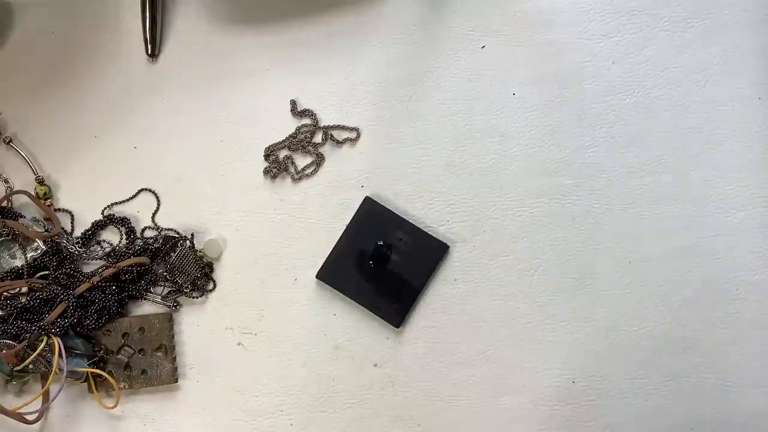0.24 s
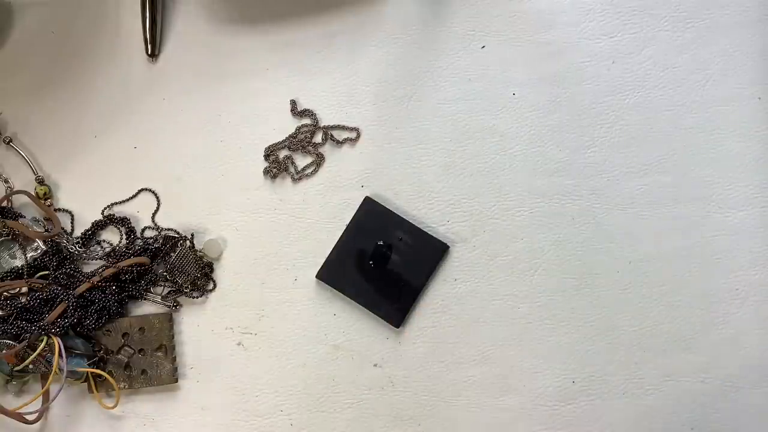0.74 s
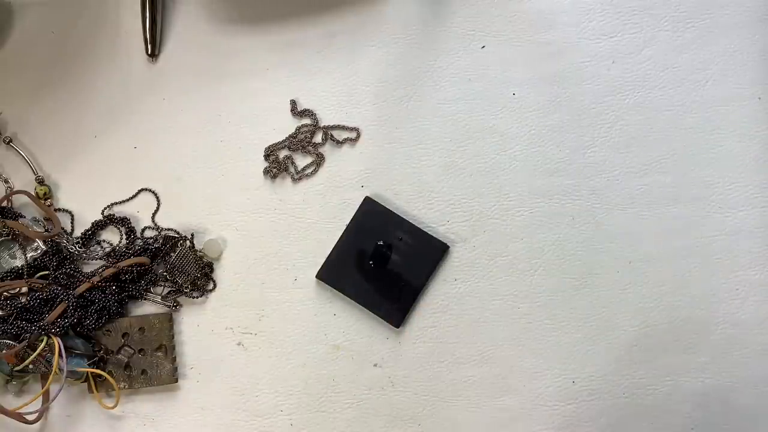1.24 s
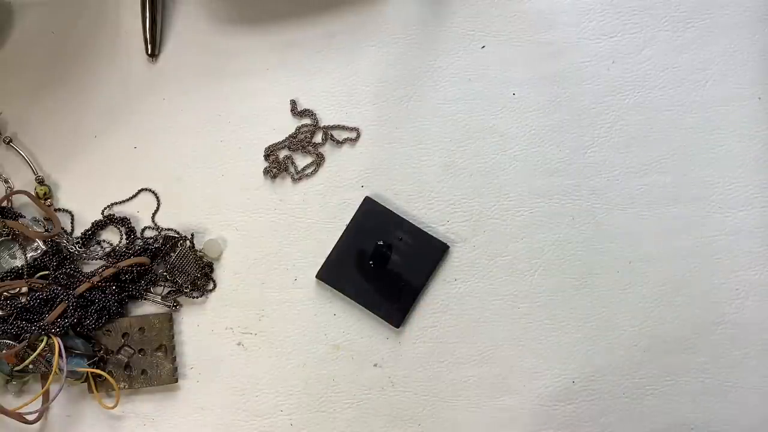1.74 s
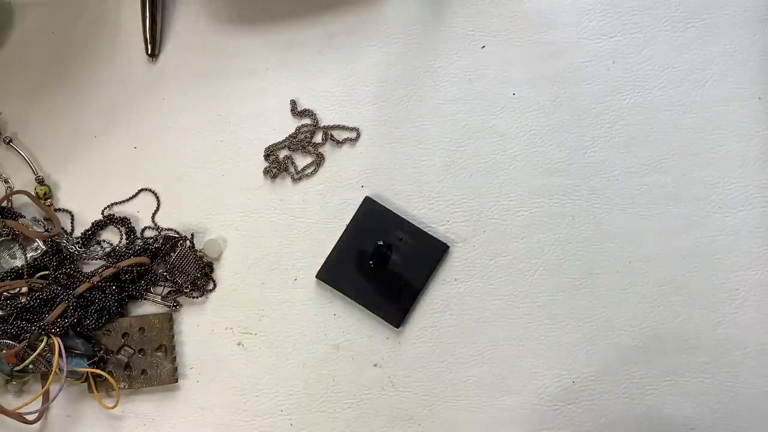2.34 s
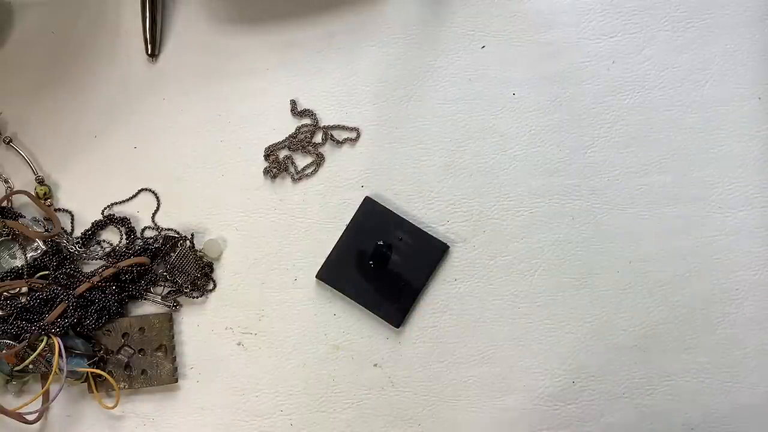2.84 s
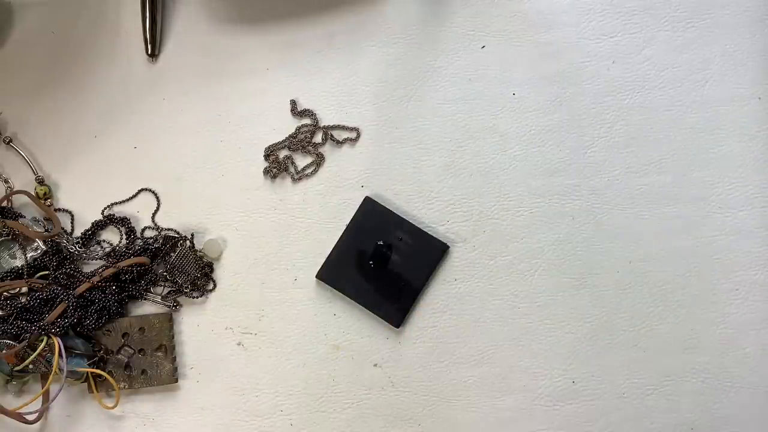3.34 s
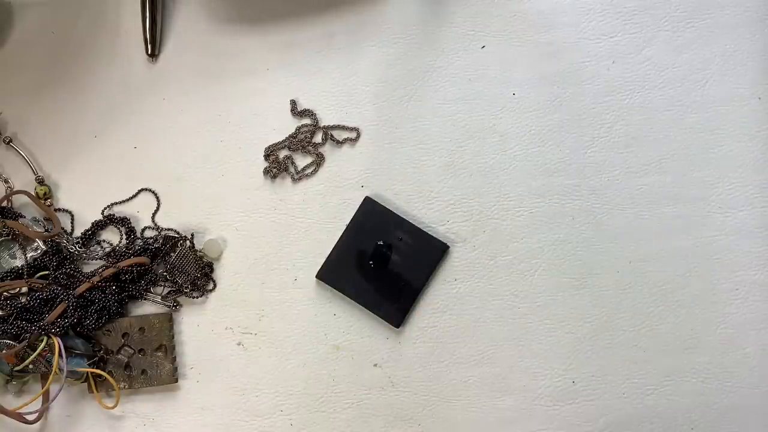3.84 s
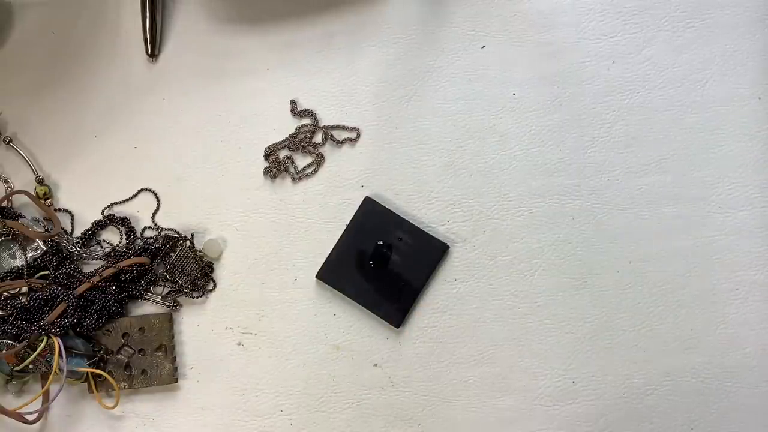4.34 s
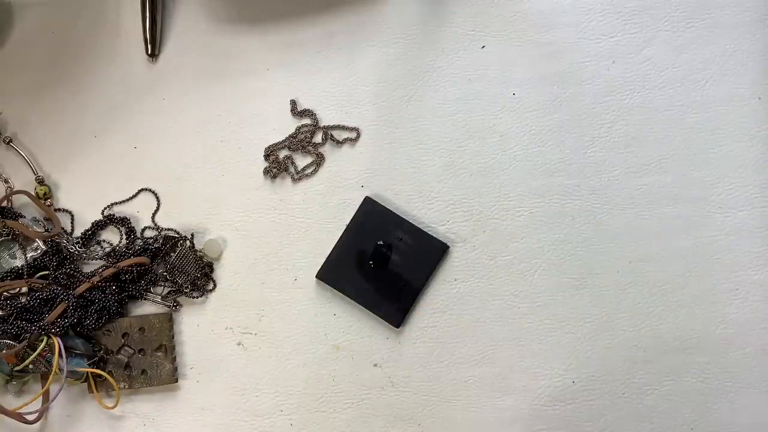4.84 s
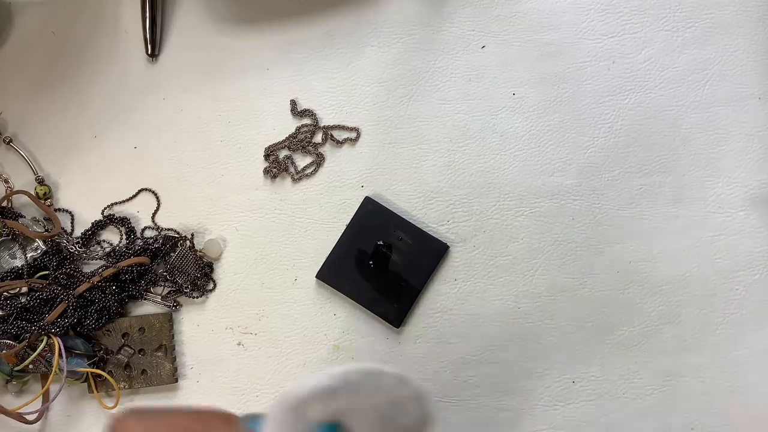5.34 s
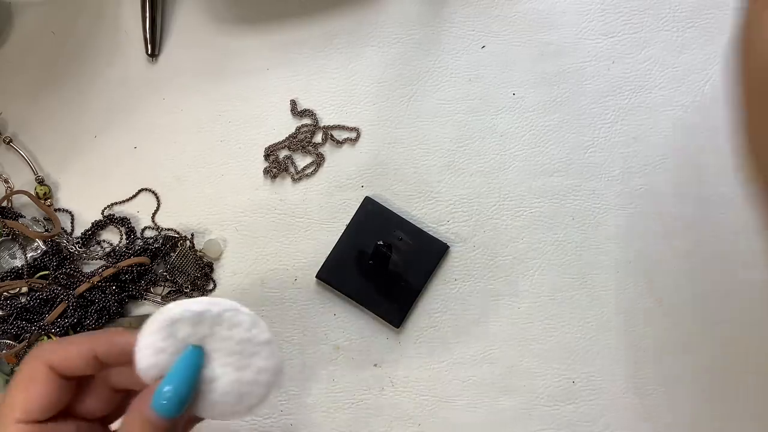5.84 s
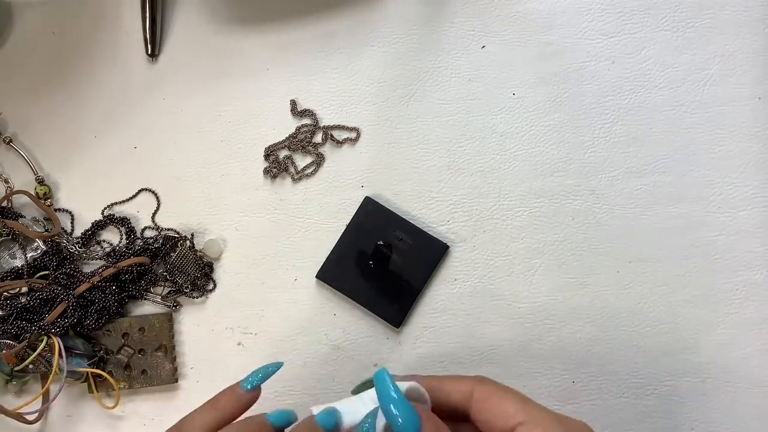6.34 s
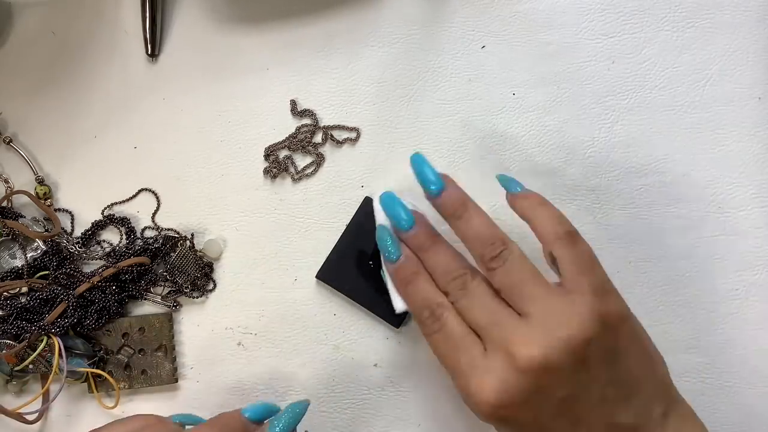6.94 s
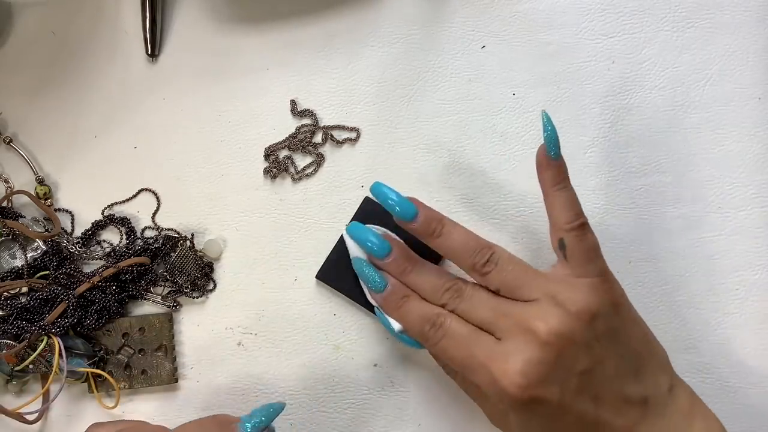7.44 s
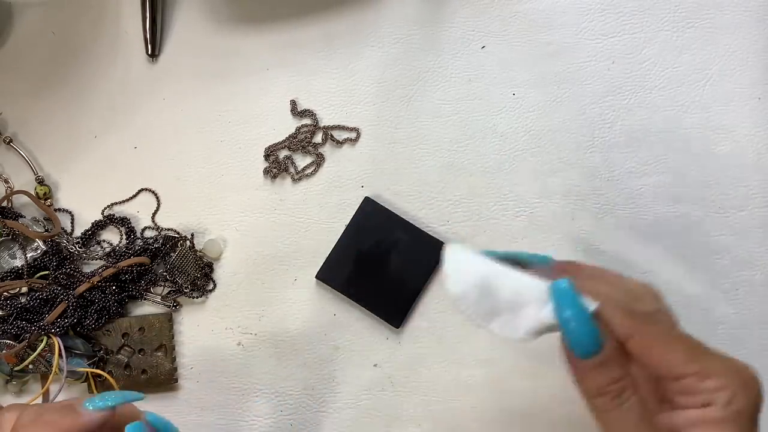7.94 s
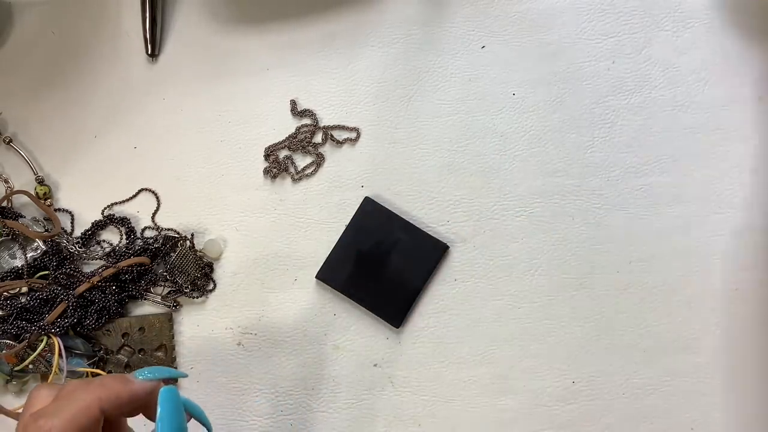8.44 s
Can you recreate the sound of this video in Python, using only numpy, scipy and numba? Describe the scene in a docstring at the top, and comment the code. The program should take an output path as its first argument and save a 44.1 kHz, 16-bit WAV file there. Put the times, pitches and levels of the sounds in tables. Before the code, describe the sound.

Crisp plastic rustling and snapping grows, peaks and dies away; a cotton pad then softly brushes a small stone tile, with small knocks.

```python
"""Pops, scrunches and rustles of a thin plastic bag under digging hands, then a cotton pad wiping a small
stone tile, with knocks on the table top; outside, a throbbing hum, a low drone and a faint falling whistle.
Creases, crackle and taps are noise bursts through resonances; wipes are shaped noise; the table is a sum of
decaying modes; hum, drone and whistle are sines. A small quiet room adds a short tail and a steady floor."""
import sys
import numpy as np
from scipy import signal
from scipy.fft import rfft, irfft
from scipy.io import wavfile
from scipy.ndimage import uniform_filter1d
from numba import njit

SR = 44100
rng = np.random.default_rng(int(sys.argv[2]) if len(sys.argv) > 2 else 0)


def output_pcm(signal):
    """Save a mono or channel-first signal as 16-bit PCM at the path in sys.argv[1].

    Samples are clipped to [-1, 1] before scaling.
    """
    pcm = np.clip(np.atleast_2d(signal).T, -1, 1) * 32767
    wavfile.write(sys.argv[1], SR, np.round(pcm).astype(np.int16))


N = 383229

# Handling of the bag. Each row: time in seconds, rustle level in dB, bass in dB against it.
HANDLING = [(0.0, -51, -3), (0.35, -56.5, -10), (0.5, -58.5, -5), (0.67, -63.5, -11), (0.79, -62, -7),
            (1.13, -68, -1), (1.57, -54.5, -8), (1.94, -62.5, -4.5), (2.11, -60.5, -4), (2.34, -53.5, -7.5),
            (2.53, -57.5, -7.5), (2.73, -54, -4), (2.85, -48, -6), (3.49, -43, -5), (3.71, -44.5, -7),
            (4.08, -50.5, -8), (4.45, -48.5, -9.5), (4.75, -55.5, -11.5), (5.19, -56.5, -7),
            (5.43, -67, -3), (5.78, -66.5, -2.5), (6.05, -77.5, -5)]
# Fistfuls of film crushed at once. Each row: centre in seconds, level in dB, bell length in seconds,
# thump in dB against the level.
SCRUNCHES = [(0, -50, 0.038, -4), (0.195, -55.5, 0.089, -22), (0.456, -47.5, 0.058, -13),
             (0.767, -47.5, 0.065, -11), (1.144, -53, 0.027, -15), (1.35, -51, 0.047, -15),
             (1.444, -50.5, 0.057, -12), (1.653, -48.5, .025, -18), (1.785, -47, 0.033, -10.5),
             (2.021, -52, 0.0087, -7), (2.193, -44.5, 0.011, -16), (2.295, -38, 0.025, -23),
             (2.445, -39, 0.022, -22), (2.472, -26.5, 0.0039, -8), (2.791, -25.5, 0.0031, -16),
             (2.896, -33.5, 0.012, -21), (2.994, -42.5, 0.033, -18), (3.182, -40.5, 0.043, -11),
             (3.28, -38, .006, -12), (3.29, -26.5, 0.0093, -7), (3.359, -35, 0.024, -14.5),
             (3.437, -32.5, 0.021, -7), (3.49, -32, 0.0065, -18), (3.581, -31.5, 0.016, -3.5),
             (3.65, -38.5, 0.025, -9.5), (3.816, -36.5, 0.025, -10), (3.874, -38, 0.028, -24),
             (3.99, -42, 0.031, -27), (4.058, -49, 0.036, -22), (4.321, -42.5, 0.056, -26),
             (4.53, -50, 0.021, -21), (4.695, -67, 0.01, -9), (4.803, -53.5, 0.022, -27),
             (4.86, -55, 0.023, -26), (5.042, -51.5, 0.033, -24), (5.135, -47, 0.047, -23),
             (5.29, -44.5, 0.02, -30), (5.648, -43, 0.025, -13), (5.717, -52.5, 0.027, -16),
             (5.832, -56, 0.025, -23), (5.979, -59, .012, -22)]
# Colour of the film's crackle. Each row: frequency in Hz, gain in dB.
FILM_COLOUR = [(60, -14.5), (110, 0), (200, -6.5), (500, -5.5), (1100, -0.5), (2400, 3), (3300, 0.5),
               (5300, 3), (9000, 1.5), (15000, -2.5)]
# Louder creases that snap. Each row: start in seconds, ring peak in dB, ring pitch in Hz, tick peak in dB.
LOUD_POPS = [(0.0021, -38, 2150, -36), (0.0253, -48, 1210, -43), (0.0373, -43, 4890, -39),
             (0.1118, -29.5, 5990, -41), (0.128, -36, 1440, -48), (0.2126, -35, 2910, -26),
             (0.2415, -39, 2540, -42), (0.2631, -36, 5640, -47), (0.2759, -47, 3210, -42),
             (0.2965, -38, 4030, -38), (0.3383, -31, 4350, -38), (0.3764, -32, 4390, -45),
             (0.4009, -31, 3400, -45), (0.4224, -26, 3340, -35), (0.439, -20, 5710, -38),
             (0.4743, -32.5, 5990, -28), (0.4885, -37, 2370, -29), (0.5389, -36, 3620, -39),
             (0.5915, -42, 4240, -48), (0.6125, -42, 3080, -37), (0.7091, -34, 5450, -42),
             (0.7523, -29, 5320, -40), (0.77, -30.5, 2040, -36), (0.8002, -32, 2840, -28),
             (0.8533, -34, 4180, -37), (0.8795, -35.5, 1260, -48), (0.9593, -31.5, 3600, -33),
             (1.002, -40.5, 2820, -58), (1.0862, -37, 3300, -33), (1.1219, -35, 1800, -37),
             (1.1653, -32, 3660, -37), (1.2971, -38, 3490, -33), (1.3288, -33, 2200, -42),
             (1.3423, -31, 5990, -20), (1.392, -35, 2330, -36), (1.4128, -33, 1960, -42),
             (1.4202, -31, 2200, -35), (1.4404, -28.5, 4930, -20), (1.4527, -32, 1210, -36),
             (1.5438, -32, 2100, -22), (1.5741, -42, 3320, -38), (1.6404, -29.5, 5040, -26),
             (1.6486, -42, 2280, -20), (1.6639, -26.5, 3920, -29), (1.6707, -29, 2330, -25),
             (1.6988, -31, 5700, -46), (1.7807, -37, 3700, -32), (1.8515, -36, 2430, -46),
             (1.8639, -35, 2330, -54), (1.902, -35, 4180, -35), (1.9881, -36.5, 3700, -29),
             (2.019, -36, 2350, -42), (2.025, -35, 1960, -36), (2.0791, -33, 5430, -47),
             (2.1512, -36, 2390, -50), (2.1757, -35, 5940, -43), (2.1835, -28.5, 2390, -37),
             (2.1907, -32, 2300, -38), (2.2031, -34, 2200, -26), (2.2608, -33, 3620, -30),
             (2.2812, -19, 5860, -24), (2.2929, -23.5, 3730, -20), (2.314, -28, 4010, -29.5),
             (2.3786, -41, 2090, -44), (2.4057, -38, 2090, -42.5), (2.4179, -29, 5150, -21),
             (2.4413, -32, 1960, -23.5), (2.4686, -13, 5430, -21.5), (2.5256, -34, 3340, -38),
             (2.5441, -37, 1210, -43), (2.5667, -37, 5450, -40), (2.6059, -27.5, 5400, -32),
             (2.6638, -32, 3700, -36), (2.6722, -32, 5430, -22), (2.6932, -34.5, 1960, -39),
             (2.7143, -28.5, 3880, -40), (2.741, -35, 3920, -36), (2.7559, -28, 3530, -29),
             (2.7867, -17, 2780, -23), (2.812, -26, 2760, -42), (2.8369, -27, 2090, -40.5),
             (2.8485, -23.5, 5470, -28), (2.892, -24, 5530, -31), (2.9226, -28, 3490, -33),
             (2.9409, -25, 3810, -42), (2.9882, -30, 1980, -33), (2.9978, -26.5, 1960, -30),
             (3.0135, -24, 2550, -34.5), (3.0273, -32, 2420, -40), (3.0428, -23, 4260, -37.5),
             (3.0649, -27, 2170, -32), (3.1218, -35, 5600, -39), (3.17, -26, 3780, -32.5),
             (3.1877, -22, 3590, -27.5), (3.2168, -23, 4670, -29.5), (3.2905, -14, 1850, -24),
             (3.2972, -24, 2360, -27), (3.35, -24, 2390, -26), (3.3638, -20, 5360, -11.5),
             (3.4222, -24, 2430, -33), (3.4287, -19, 2430, -36), (3.4387, -19, 1870, -36),
             (3.4477, -22, 1550, -30), (3.4596, -22, 2200, -29), (3.4818, -25, 1420, -26),
             (3.4901, -17.5, 5620, -30), (3.5408, -21.5, 5230, -25), (3.5537, -32, 5300, -36),
             (3.5638, -19, 2020, -29), (3.5801, -15.5, 2240, -34), (3.5869, -14.5, 5500, -26),
             (3.6321, -16.5, 4000, -28), (3.6461, -25, 5450, -23), (3.6655, -29, 3830, -23),
             (3.6855, -27.5, 3830, -29), (3.7127, -30, 1830, -38), (3.7509, -34, 2000, -32),
             (3.7665, -24.5, 4820, -35), (3.7837, -29, 2370, -29), (3.8113, -15.5, 5770, -17),
             (3.8617, -36, 3960, -25), (3.874, -31, 2350, -20), (3.8802, -35, 1230, -20),
             (3.8983, -30, 1870, -27), (3.9333, -38, 1310, -43), (3.9689, -26, 4690, -28),
             (3.9752, -27, 4930, -33), (3.9922, -27, 4480, -33), (4.0302, -24, 4590, -29),
             (4.0644, -31.5, 1290, -25), (4.0834, -27, 3490, -38), (4.1193, -35, 1210, -36),
             (4.152, -36, 5680, -37), (4.1813, -28.5, 2820, -15), (4.2248, -39, 5530, -36),
             (4.2611, -32, 4350, -25), (4.2868, -33, 3170, -19), (4.3135, -31, 4800, -23),
             (4.3412, -26, 4310, -35), (4.3503, -32, 2610, -30), (4.4411, -30, 4840, -42),
             (4.4581, -25, 3510, -40), (4.4861, -26, 2760, -27), (4.5138, -23.5, 5170, -22),
             (4.5317, -26, 2760, -17), (4.5428, -32, 1340, -30), (4.6065, -26.5, 2710, -36),
             (4.6287, -37, 5580, -40), (4.6681, -42, 4260, -54), (4.6831, -24.5, 5640, -29),
             (4.7, -39, 2650, -32), (4.721, -39, 1380, -41), (4.7634, -38, 1440, -36),
             (4.7746, -31, 1550, -44), (4.7861, -35, 1510, -35), (4.7952, -35, 3360, -27),
             (4.8258, -36, 1270, -43), (4.8466, -30, 4930, -25), (4.8975, -39, 2820, -38),
             (4.9905, -37, 2710, -32), (5.0308, -37, 3120, -36), (5.0405, -25.5, 4650, -21),
             (5.0679, -35.5, 2890, -24), (5.0793, -29, 2730, -32), (5.1199, -30, 2650, -34),
             (5.1609, -28, 4740, -31), (5.261, -40, 2670, -44), (5.2954, -38, 4460, -29),
             (5.4045, -46, 4630, -57), (5.4776, -41.5, 3810, -56), (5.5918, -44, 1960, -50),
             (5.6256, -32, 1830, -52), (5.7243, -40, 2890, -49), (5.9386, -42, 2430, -53),
             (5.9754, -42, 4520, -29)]
# Throbs of a low hum. Each row: centre in seconds, half length in seconds, pitch in Hz, level in dB.
HUM_THROBS = [(0.183, 0.025, 49.3, -60), (0.352, 0.07, 48.3, -60), (1.472, 0.085, 52.5, -55),
              (1.696, 0.046, 51.2, -61), (1.881, 0.079, 50.3, -54.5), (2.052, .12, 49.4, -57),
              (2.501, 0.17, 51.5, -55.5), (2.75, 0.049, 50.8, -56), (5.479, 0.055, 51.6, -57),
              (5.731, 0.082, 50.5, -54), (6.949, .04, 51.7, -54), (7.169, 0.074, 51.4, -51),
              (7.358, .05, 52.2, -53), (7.479, 0.056, 54.7, -54), (7.681, 0.094, 52.2, -51.5),
              (8.07, 0.22, 50.7, -50)]
# A drone that rises and falls, perhaps a far engine. Each row: time in seconds, pitch in Hz, level in dB.
DRONE_PATH = [(5.15, 53.7, -79), (5.5, 56.5, -64), (5.65, 60, -71), (5.9, 62.1, -58.5), (6.9, 62, -61),
              (7.35, 58.5, -62), (7.84, 57.7, -74), (8.26, 53.3, -62), (8.69, 46.7, -71)]
# Tile, bag and nails on the table top. Each row: start in seconds, blow in dB, contact in ms, tap peak in dB,
# tap pitch in Hz, tap decay in ms.
KNOCKS = [(5.272, -51, 0.43, -34.5, 577, 14), (5.292, -50, .9, -40, 564, 20),
          (5.637, -48, 2.4, -41, 604, 8.7), (6.791, -67, 0.5, -51, 1706, 4.4),
          (6.915, -76, 0.55, -46, 9130, 1.5), (7.106, -65, 0.42, -56, 1480, 3.7),
          (7.487, -63, 0.34, -42.5, 2900, 3.5), (7.5931, -37, 1.56, -34.5, 2020, 2.8),
          (7.6152, -41.5, 1.36, -42.5, 710, 12), (7.711, -60, 0.56, -49, 685, 30),
          (7.889, -52, 2.6, -55, 595, 74), (8.409, -71.5, 0.52, -47, 2940, 2.4),
          (8.64, -57, 0.51, -46, 3950, 3), (8.663, -60, 0.54, -38.5, 4800, 2.5)]
# Modes of the table top. Each row: frequency in Hz, level in dB against the blow, 60 dB decay in seconds.
TABLE_MODES = [(76, -8.5, 0.16), (128, -14, 0.39), (199, -12, 0.32), (285, 0, 0.2), (355, -2, 0.094),
               (388, -6, 0.11), (430, -7, 0.15), (612, -9, 0.11), (1044, -33, 0.033), (1430, -25, .05)]
# A faint whistle, perhaps a bird outside. Each row: time in seconds, pitch in Hz, level in dB.
WHISTLE_PATH = [(5.912, 3600, -74), (5.93, 3380, -73), (5.96, 3200, -78), (5.99, 3050, -82)]
# Fingers fold the pad and stroke it over the tile. Each row: start, rise, hold and fall in seconds,
# level in dB, scrape and treble in dB against the level.
WIPES = [(6.01, .01, 0.065, 0.079, -72.5, -11, 5), (6.14, 0.032, 0.15, 0.035, -74.5, -0.5, 3.5),
         (6.374, 0.026, .02, .02, -80, 5, 4), (6.477, 0.033, 0.026, .05, -74.5, -5.5, 3),
         (6.61, .02, 0.025, .05, -80, 1, 4), (6.799, 0.0023, 0.012, 0.06, -82, 13, 1),
         (6.855, 0.081, 0.076, 0.036, -60, -7, -1.5), (7.105, .01, 0.028, .03, -71, -6.5, -1.5),
         (7.248, 0.056, 0.094, 0.057, -56, -12.5, -1), (7.487, .003, 0.095, 0.012, -59.5, -7.5, 6),
         (7.59, 0.0028, 0.0044, 0.058, -56, -0.5, 2.5), (7.706, 0.005, .01, 0.094, -64, 5.5, 0),
         (7.96, 0.035, 0.089, 0.064, -80, -2, 6), (8.402, 0.0026, .005, .05, -76, 9, -8),
         (8.61, 0.034, 0.015, 0.044, -66.5, 3, 8.5)]
# Colour of the fibre hiss. Each row: frequency in Hz, density in dB per Hz.
COTTON_COLOUR = [(2200, -14), (2900, -7), (4200, -2.5), (5300, -1), (6100, -0.5), (7000, -12.5)]
# Colour of the scrape. Each row: frequency in Hz, density in dB per Hz.
SCRAPE_COLOUR = [(650, -10), (1100, -2), (1600, 1), (1950, 0.5), (2400, 0), (2900, -10), (3600, -29)]
# Colour of the steady floor. Each row: frequency in Hz, density in dB per Hz.
AIR_COLOUR = [(24, -45), (36, -13), (48, -5.5), (60, -2.5), (90, -7.5), (160, -11), (280, -10.5),
              (400, -17.5), (600, -21), (1000, -28.5), (1800, -36), (4000, -39), (8000, -38), (16000, -41)]
# Colour of the room's tail. Each row: frequency in Hz, gain in dB.
ROOM_COLOUR = [(150, -20), (300, 0), (5000, -3.5), (10000, -1.5), (16000, -8)]
# Microphone response. Each row: frequency in Hz, gain in dB.
MIC_RESPONSE = [(25, -28), (42, -8), (60, 0), (4000, -1), (5600, -0.5), (6050, 1), (6300, -7.5), (7500, -4),
                (15000, -5.5)]

RUSTLE_TREBLE_DB = -2.5  # against the rustle
PUSH_DB, PUSH_DB_PER_OCTAVE, PUSH_SCATTER_DB = -13, -2.5, 3.5  # against the ring; slope about 2500 Hz
SMALL_POPS_PER_S, SMALL_POP_DB, SMALL_POP_SPREAD_DB = 40., 10, 3.0  # least peak over the rustle, spread
SMALL_TICK_DB = -3  # against the small pop's ring
WIPE_EDGE_DB = -23  # change over one rise or fall time
AIR_DB = -64.5
ROOM_T60_S, ROOM_DB, ROOM_GAP_S = .2, -12.5, 0.0013
TOP_HZ = 15900


def undb(db):
    """Gain of a level in dB."""
    return 10 ** (np.asarray(db, float) / 20)


def curves(table):
    """Columns of a table after its times, one value a sample."""
    s, *columns = np.transpose(table)
    return [np.interp(np.arange(N) / SR, s, column) for column in columns]


def unit(x):
    """Scaled to rms 1."""
    return x / np.sqrt(np.mean(x ** 2))


def colour(x, points, size=2048):
    """Causal minimum-phase filter through (Hz, dB) points."""
    hz, db = np.transpose(points)
    bin_hz = np.arange(size // 2 + 1) * SR / size
    log_gain = np.log(undb(np.interp(np.log(bin_hz + 1), np.log(hz), db)))
    # folding the cepstrum makes the filter minimum phase
    cepstrum = irfft(log_gain)
    cepstrum[1:size // 2] *= 2
    cepstrum[size // 2 + 1:] = 0
    return signal.fftconvolve(x, irfft(np.exp(rfft(cepstrum))))[:N]


def band(x, lo_hz, hi_hz):
    """Band-pass."""
    return signal.sosfilt(signal.butter(2, [lo_hz, hi_hz], "bandpass", fs=SR, output="sos"), x)


@njit
def snaps(noise, start, gain, hz, width, decay_s, rise_s):
    """Each snap is a burst of noise that rises and dies, through its own resonance, scaled to its peak."""
    out, y = np.zeros(len(noise)), np.empty(4096)
    for n in range(len(start)):
        g, k = np.tan(np.pi * hz[n] / SR), width[n]  # k is 1/Q
        fall, env, b, l, top = np.exp(-1 / (decay_s[n] * SR)), 1., 0., 0., 1e-9
        i0 = start[n]
        length = min(int(7 * decay_s[n] * SR + 6 * SR / (hz[n] * k)), 4096, len(noise) - i0)
        for i in range(length):
            x = env * min((i + 1) / (rise_s * SR), 1.) * noise[i0 + i]
            # state-variable band-pass: v is the band, b and l its states
            v = (b + g * (x - l)) / (1 + g * (g + k))
            b, l, y[i] = 2 * v - b, l + 2 * g * v, v
            env *= fall
            top = max(top, abs(v))
        out[i0:i0 + length] += y[:length] * gain[n] / top
    return out


def crackle(per_s, spread_db, top_db, decay_s, hiss_db):
    """Countless small creases of all sizes and pitches over a fine hiss; rms 1."""
    when, pitch, size, keep = rng.random((int(N / SR * 2000), 4)).T
    kept = (keep < per_s / 2000) & (when * N / SR < HANDLING[-1][0])
    start = (when[kept] * (N - 1)).astype(np.int64)
    gain = undb(np.minimum(-spread_db * np.log(1 - size[kept]), top_db))
    hz = 150 * (15000 / 150) ** (pitch[kept] ** .6)
    one = np.ones(len(hz))
    grains = snaps(rng.standard_normal(N), start, gain, hz, 0.85 * one, decay_s * one, 0.00035)
    hiss = colour(rng.standard_normal(N), [(60, 3.0), (16000, -10)])
    return unit(colour(unit(grains) + undb(hiss_db) * unit(hiss), FILM_COLOUR))


def bag():
    """Handling sets the level of the crackle; scrunches add dense bursts with a thump of air."""
    level_db, bass_db = curves(list(HANDLING) + [(HANDLING[-1][0] + 0.055, -120, 0)])
    fine = crackle(per_s=600., spread_db=2.3, top_db=7.1, decay_s=0.0033, hiss_db=-12.0)
    dense = crackle(per_s=1800., spread_db=1.0, top_db=5.1, decay_s=.0013, hiss_db=-3.9)
    low = unit(band(dense, 74, 1200))
    mid = unit(band(fine, 900, 8200))
    high = unit(band(fine, 6070, 19000))
    out = undb(level_db) * (mid + undb(bass_db) * low + undb(RUSTLE_TREBLE_DB) * high)
    thump = unit(band(rng.standard_normal(N), 64, 190))
    t = np.arange(N) / SR
    for s, db, length_s, thump_db in SCRUNCHES:
        near = slice(max(int((s - .2) * SR), 0), int((s + .2) * SR))
        from_s = t[near] - s
        out[near] += undb(db) * np.exp(-(from_s / length_s) ** 2) * dense[near]
        # the squeezed air leaves a little later
        thump_bell = np.exp(-((from_s - .008) / (length_s + 0.0027)) ** 2)
        out[near] += undb(db + thump_db) * thump_bell * thump[near]
    return out


def air():
    """Steady floor: rumble of the room and hiss of the microphone."""
    return undb(AIR_DB) * unit(colour(rng.standard_normal(N), AIR_COLOUR, size=8192))


def small_pops(most_per_s=100):
    """Rows for the many faint creases between the loud ones; their size follows the handling."""
    s, pitch, size, tilt, keep = rng.random((int(most_per_s * N / SR), 5)).T
    s = s * N / SR
    rustle_db = np.interp(s, *np.transpose(HANDLING)[:2])
    ring_db = rustle_db + SMALL_POP_DB - SMALL_POP_SPREAD_DB * np.log(1 - size)
    tick_db = ring_db + SMALL_TICK_DB + 16 * (tilt - .5)
    rows = np.transpose([s, ring_db, 1200 * 5 ** pitch, tick_db])
    return rows[(keep < SMALL_POPS_PER_S / most_per_s) & (s < HANDLING[-1][0])]


def pops(rise_s=0.00092):
    """A crease flips over: a ring of the facet, a push of air below it, a tick above it."""
    s, ring_db, ring_hz, tick_db = np.vstack([LOUD_POPS, small_pops()]).T
    decay_chance, tick_chance, push_chance = rng.standard_normal((len(s), 3)).T
    # low rings push more air
    push_db = ring_db + PUSH_DB + PUSH_DB_PER_OCTAVE * np.log2(ring_hz / 2500)
    push_db += PUSH_SCATTER_DB * push_chance
    start, one = (s * SR).astype(np.int64), np.ones(len(s))
    noise = rng.standard_normal((3, N))
    ring_decay_s = 0.0015 * np.exp(0.51 * decay_chance)
    ring = snaps(noise[0], start, undb(ring_db), ring_hz, 0.83 * one, ring_decay_s, rise_s)
    push = snaps(noise[1], start, undb(push_db), 570.0 * one, 1.4 * one, 0.0037 * one, 2 * rise_s)
    tick_hz = 9540.0 * np.exp(0.047 * tick_chance)
    # the tick starts 18 samples later
    tick = snaps(noise[2], start + 18, undb(tick_db), tick_hz, 0.69 * one, .0007 * one, 0.041 * rise_s)
    return ring + push + tick


def hum():
    """Each throb is a low sine that swells and fades as a flat-topped bell."""
    t = np.arange(N) / SR
    out = np.zeros(N)
    for s, half_s, hz, db in HUM_THROBS:
        bell = np.exp(-((t - s) / half_s) ** 4)
        out += np.sqrt(2) * undb(db) * bell * np.sin(2 * np.pi * hz * (t - s))
    return out


def glide(path, fade_s):
    """A sine on a pitch curve, fading in before the path and out after it."""
    hz, db = curves(path)
    t = np.arange(N) / SR
    ends = np.clip(1 + np.minimum(t - path[0][0], path[-1][0] - t) / fade_s, 0, 1)
    return np.sqrt(2) * ends * undb(db) * np.sin(2 * np.pi * np.cumsum(hz) / SR)


def drone():
    """A single low sine wanders in pitch and level."""
    return glide(DRONE_PATH, fade_s=.05)


def knocks():
    """A half-sine push rings the table, duller for a longer contact; the contact itself adds a dry tap."""
    s, _, _, tap_db, tap_hz, tap_ms = np.transpose(KNOCKS)
    # low taps ring in a narrower band than high ones
    width = np.clip(tap_hz / 2500, .35, 1.2)
    start = (s * SR).astype(np.int64)
    out = snaps(rng.standard_normal(N), start, undb(tap_db), tap_hz, width, tap_ms / 1000, 0.000091)
    t = np.arange(SR // 3) / SR
    hz, db, t60_s = np.transpose(TABLE_MODES)[:, :, None]
    for s, blow_db, contact_ms, *_ in KNOCKS:
        # each blow excites the modes a little differently
        share = undb(db + 1.9 * rng.standard_normal(hz.shape))
        modes = share * np.exp(-np.log(1000) * t / t60_s) * np.sin(2 * np.pi * hz * t)
        ring = np.sum(modes, axis=0)
        push = np.sin(np.pi * np.clip(t[:200] * 1000 / contact_ms, 0, 1))
        i0 = int(s * SR)
        hit = np.convolve(ring, push / push.sum())[:N - i0]
        out[i0:i0 + len(hit)] += undb(blow_db) * hit
    return out


def whistle():
    """A single high sine slides down in pitch."""
    return glide(WHISTLE_PATH, fade_s=0.007)


def pad():
    """Cotton fibres hiss over the stone, smooth, with a slight flutter; a duller scrape lies under it."""
    flutter_db = 1.4 * unit(uniform_filter1d(rng.standard_normal(N), 400))
    fibres = unit(colour(rng.standard_normal(N), COTTON_COLOUR))
    scrape = unit(colour(rng.standard_normal(N), SCRAPE_COLOUR))
    treble = unit(band(rng.standard_normal(N), 4900, 16600))
    out, t = np.zeros(N), np.arange(N) / SR
    for s, rise_s, hold_s, fall_s, db, scrape_db, treble_db in WIPES:
        # 0 while held, -1 one rise before or one fall after; cut at -1.5
        rising = np.minimum(t - s - rise_s, 0) / rise_s
        falling = np.minimum(s + rise_s + hold_s - t, 0) / fall_s
        press = np.minimum(rising, falling)
        touch = (press > -1.5) * undb(db - WIPE_EDGE_DB * press)
        out += touch * (fibres + undb(scrape_db) * scrape + undb(treble_db) * treble)
    return out * undb(flutter_db)


def room(x):
    """Table top and near walls send back a short tail."""
    t = np.arange(int(.3 * SR)) / SR
    tail = colour(rng.standard_normal(N), ROOM_COLOUR)[:len(t)]
    tail = tail * np.exp(-np.log(1000) * t / ROOM_T60_S) * (t > ROOM_GAP_S)
    return x + undb(ROOM_DB) * signal.fftconvolve(x, tail / np.sqrt(np.sum(tail ** 2)))[:N]


def scene():
    """Bag and knocks in the room; the pad and the far sounds without its tail."""
    far = hum() + drone() + whistle()
    return (room(bag() + pops() + knocks()) + pad() + far)[None]


def record(dry):
    """The microphone port steps down above 6 kHz; the steady floor joins; the top is cut."""
    heard = colour(dry[0], MIC_RESPONSE, size=8192) + air()
    top_cut = signal.ellip(8, .2, 70, TOP_HZ, fs=SR, output="sos")
    return signal.sosfilt(top_cut, heard)[None]


dry = scene()
out = record(dry)
output_pcm(out)
```